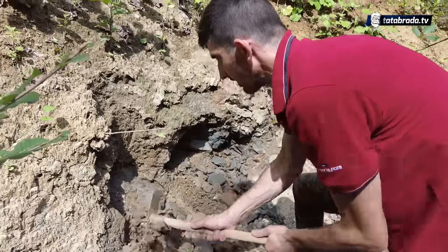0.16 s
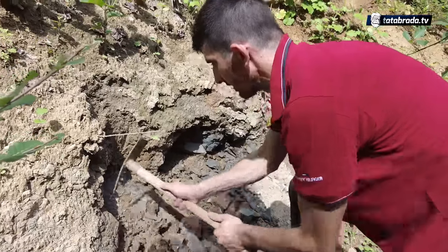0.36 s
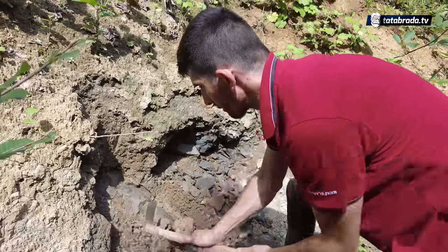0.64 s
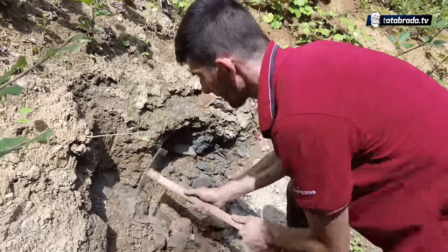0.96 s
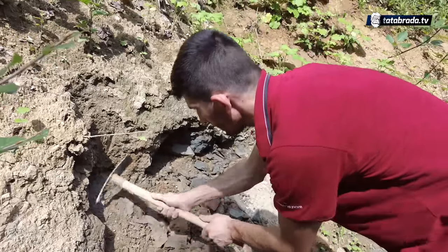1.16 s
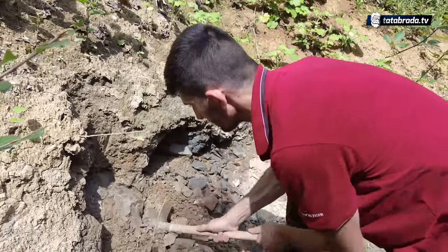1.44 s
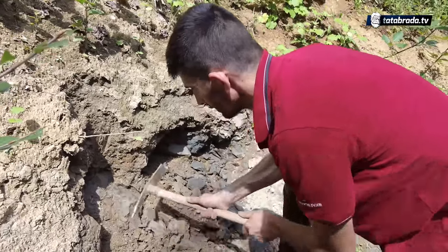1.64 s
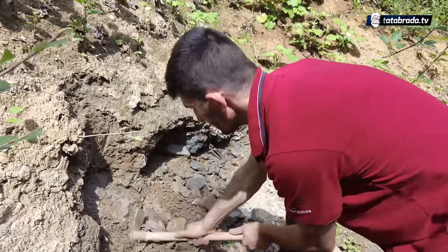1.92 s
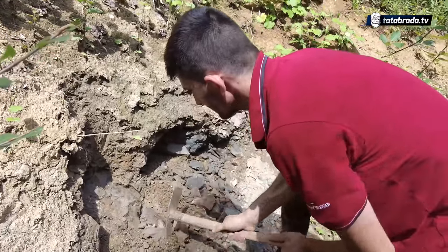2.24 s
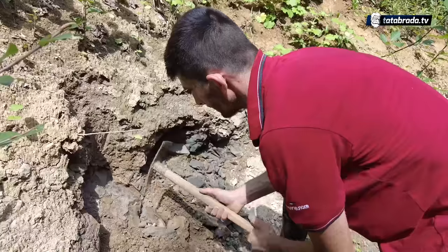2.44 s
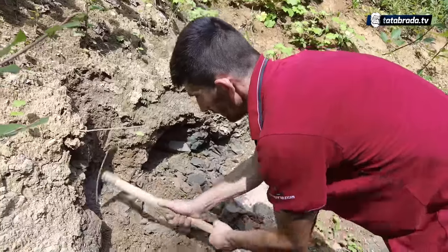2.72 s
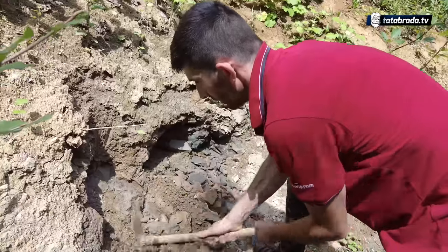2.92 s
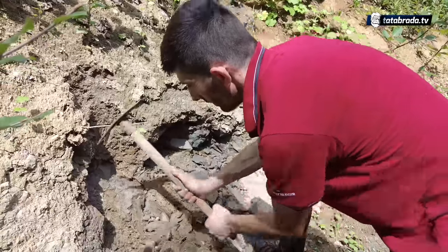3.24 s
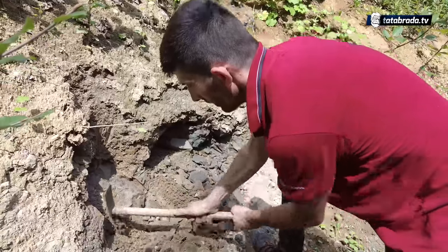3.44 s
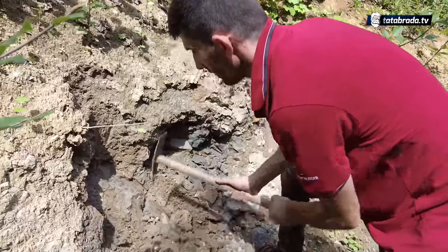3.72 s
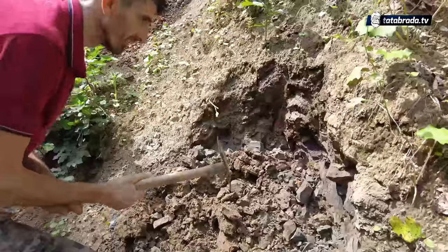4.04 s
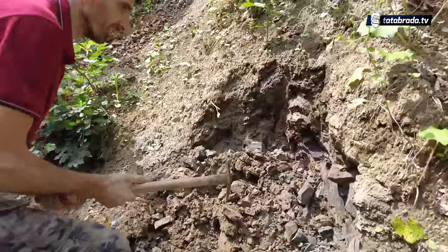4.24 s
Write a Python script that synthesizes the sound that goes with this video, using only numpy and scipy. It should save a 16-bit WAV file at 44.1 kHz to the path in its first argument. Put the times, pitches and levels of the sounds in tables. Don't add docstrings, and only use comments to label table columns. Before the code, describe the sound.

Outdoors, close to a crumbly shale bank, wind softly buffets the stereo microphone over faint air and hiss. Grit trickles, and from 0.07 s a small steel pick gives quick crunching knocks, with a dull clod at 0.3 s. Earthy blows with low thumps come at 0.6-0.85 s, a rough scrape at 0.65 s, then lighter dragging around 1.0-1.2 s. At 1.3-1.4 s two strong cracks, one stony, one steely, scatter chips, and flakes clatter near 1.6 s. The background drops slightly at 1.7 s. A loud bright strike lands at 1.94 s with a brief steel ring, then near calm. The sharpest, loudest blow hits at 2.86 s, followed by scraping and dropping clods to 3.0 s. A faint squeak at 3.3 s, a light clink with a low heave at 3.43 s and a duller knock at 3.6 s follow. Sound cuts out at 3.94-4.0 s, then weak taps, scrapes and crumbs continue to about 4.37 s.

```python
import sys
import numpy as np
from scipy import signal
from scipy.fft import rfft, irfft
from scipy.io import wavfile
from scipy.ndimage import map_coordinates

SR = 44100
rng = np.random.default_rng(int(sys.argv[2]) if len(sys.argv) > 2 else 0)


def how_loud(loudness_db):
    steps = np.asarray(loudness_db, float) / 20
    return 10 ** steps


def wav_out(sig):
    wavfile.write(sys.argv[1], SR, np.round(np.clip(np.atleast_2d(sig).T, -1, 1) * 32767).astype(np.int16))


N = 192672

# pitch_hz, level_db
FAR_AIR_SPECTRUM = [(71, -53), (120, -42), (195, -1.5), (468, -23), (718, -12), (791, -18.5), (1140, -18.5),
                    (1820, -15), (2220, -22), (2590, -20.5), (5630, -27), (12500, -33), (16200, -68),
                    (22000, -120)]
# pitch_hz, likeness (0 to 1)
AIR_LIKENESS = [(60, 0.71), (200, 0.91), (600, 0.05), (1400, 0.24), (6000, 0.89), (15000, .1)]
# top_s, rumble_db, flutter_db (relative
GUSTS = [(0.03, -38.5, -5), (0.63, -34.5, -16), (0.859, -43, -2.5), (1.2, -52, 1.5), (1.36, -45, 5),
         (1.58, -51.5, -23), (1.97, -38.5, -6.5), (2.24, -48, -10.5), (2.55, -56.5, -7), (2.87, -46, -0.5),
         (3.45, -36, -18), (3.7, -51.5, -7), (4.05, -46.5, -17.5), (4.37, -44, -5)]
# start_s, gain_db, drift_db_per_s
SHOT_GAINS = [
    (0, -0.5, 2.5),
    (1.681, -11, 1.7),
    (3.97, -2.5, -6),
]
# pitch_hz, width_hz, level_db
EARTH_MODES = [(190, 223, -5.5), (326, 123, -8), (560, 225, -1.5), (635, 160, 5), (830, 36, -10)]
# pitch_hz, width_hz, level_db
SHALE_MODES = [(1342, 122, -1), (1482, 174, 3), (1760, 500, -3), (2115, 1250, -4.5), (2950, 450, -2),
               (3613, 320, -4)]
# pitch_hz, width_hz, level_db
STEEL_MODES = [(4160, 280, 6), (4804, 150, 4.5), (4930, 67, -21.5), (5860, 250, 4.5), (6160, 147, -2.5),
               (8380, 330, -9), (9480, 460, -6), (9800, 83, -12.5), (11360, 2500, -13)]
# time_s, flow_db, fineness_db
TRICKLE = [(0.0, -50, -7), (0.16, -41, 1.5), (0.24, -57.5, -6), (0.44, -52.5, 0.5), (0.69, -43, -3.5),
           (0.84, -52.5, -2.5), (1.08, -56.5, 8), (1.22, -56.5, 0.5), (1.38, -44.5, 0), (1.66, -50.5, 2),
           (1.69, -64.5, 2.5), (2.02, -52, 5), (2.11, -56.5, 3.5), (2.4, -65, 2.5), (2.83, -69, 3),
           (3.6, -61.5, -4.5), (3.93, -69.5, -3), (4.37, -65, -2.5)]
# start_s, length_s, drag_db,
# fineness_db, swell_db (start to end)
STROKES = [(0.043, 0.032, -60, 7, 1.5), (0.07, 0.03, -37, 1.5, -8), (0.136, 0.072, -33.5, -2.5, -12.5),
           (0.65, 0.058, -22, -1.5, 1.5), (0.995, 0.067, -35, 5, 0.5), (1.073, 0.15, -39, 5, -3),
           (1.326, 0.08, -31.5, 2.5, -19), (1.418, 0.052, -33, 2, -15), (1.984, 0.033, -48, 2, -11),
           (2.016, 0.052, -37.5, -6.5, 7), (2.477, 0.11, -55.5, 10, 5), (2.879, 0.033, -43, -6.5, -6),
           (2.909, 0.12, -35, -2, -4), (3.53, 0.042, -48, 1.5, 11), (3.623, 0.047, -35.5, -6, -23.5),
           (4.221, 0.043, -41.5, -6, -7.5), (4.304, 0.058, -47, 3, 16), (4.002, 0.17, -63, -10, -0.5),
           (1.835, 0.018, -40, -2, -5)]
# start_s, peak_db, first_hz, last_hz, t60_s
GROUND_SHOCKS = [
    (.597, -17, 514, 69.4, 0.078),
    (.85, -16, 480, 387, 0.03),
    (1.325, -43, 405, 149, 0.21),
    (1.945, -18, 710, 410, 0.044),
    (1.966, -31, 303, 190, 0.22),
    (2.863, -25.5, 604, 138, 0.07),
    (3.437, -25.5, 59, 33.6, 0.41),
    (3.623, -35, 680, 560, 0.029),
]
# start_s, end_s, pitch_hz, width_hz, level_db
RUBBED_RINGS = [
    (1.973, 2.066, 4760, 70, -47),
    (3.281, 3.3, 2710, 89.5, -52),
    (3.44, 3.56, 4900, 60, -65),
    (3.454, 3.585, 6020, 60.6, -65),
    (1.833, 1.851, 714, 80.4, -49),
    (2.93, 2.974, 2940, 120, -48),
]
# start_s, peak_db, pitch_hz,
# crush_ms
FLAKES = [(0.0365, -31, 2670, 4.1), (0.398, -29, 6000, 1.6), (0.495, -35, 5140, 9), (0.746, -24, 3140, 1.6),
          (0.9408, -31.5, 2860, 2.8), (0.9967, -26, 1270, 7.1), (1.0041, -21, 4740, 1),
          (1.085, -29, 3220, 5.8), (1.3574, -17.5, 1460, 4.9), (1.377, -17, 3440, 5.1),
          (1.421, -25, 1460, 4.1), (1.5596, -27, 3100, 3.4), (1.6069, -19, 2110, 3.3),
          (1.6075, -24.5, 6500, 2.2), (1.6159, -20, 3200, 1.6), (1.972, -20, 4500, 2.7),
          (2.0632, -30, 1490, 1.6), (2.6657, -41, 640, 7), (2.7857, -41, 4860, 5.5),
          (2.871, -21, 5200, 4.1), (2.968, -29.5, 6200, 2.2), (1.277, -36, 4900, 3.5),
          (3.555, -33, 6200, 4.8), (4.347, -31.5, 2900, 6), (2.9503, -23, 3070, 2.2),
          (3.1277, -45, 2950, 9), (3.5346, -35.5, 2720, 0.73), (3.9257, -40, 1420, 1.9),
          (4.3256, -35, 2740, 12)]
# start_s, peak_db, pitch_hz, crush_ms
CLODS = [(0.1198, -29, 795, 3.4), (0.3048, -17, 1134, 2.6), (0.4658, -30, 830, 17), (0.5453, -21, 844, 7.2),
         (0.6534, -22, 780, 5), (0.849, -19.5, 433, 2.9), (1.5293, -32, 396, 5.5), (1.8358, -21.5, 800, 5),
         (3.003, -24, 820, 4), (2.9818, -20.5, 830, 3.7), (3.6244, -18.5, 562, 6.2), (3.6465, -33, 573, 6),
         (3.7241, -33, 440, 15), (4.0549, -29.5, 780, 7), (4.2275, -40, 900, 14)]
# start_s, peak_db, pitch_hz, crush_ms, fall_db_per_octave (away from that pitch)
STRIKES = [(0.0705, -18.5, 1730, 10.7, 6), (0.1438, -19.5, 560, 5.3, 1.5), (0.153, -19.5, 604, 2.5, 0.5),
           (0.5913, -18, 537, 7.9, 2.7), (0.6741, -16.5, 610, 3.6, 0.7), (0.7923, -32.5, 1550, 1.9, 5),
           (0.8416, -17, 9100, 4.2, 6), (1.3188, -12, 1340, 7.9, 0.6), (1.3993, -11, 4160, 3.9, 9),
           (1.501, -20.5, 3180, 7.9, 7.5), (1.568, -33, 560, 3.2, 4), (1.811, -22, 3060, 5.1, 6),
           (1.9388, -3, 4620, 6.1, 4), (1.9506, -21, 8600, 16, -0.2), (1.967, -24.5, 1500, 6.2, 5),
           (2.0297, -19.5, 4450, 5, 4.5), (2.8595, 1.6, 4900, 4.2, 3.6), (2.9963, -25.5, 4730, 21, 1.3),
           (3.2813, -27, 1350, 9.9, 8), (3.4271, -19, 6000, 6.5, 0.3), (3.548, -30.5, 810, 13.4, 1),
           (3.612, -12.5, 830, 4.2, 3), (4.1208, -35, 1310, 4.5, 1), (4.143, -37.5, 760, 13, 2)]

CLOD_FALL_DB, FLAKE_FALL_DB = 9.5, 8
EARTH_HZ, SHALE_HZ, STEEL_HZ = 560, 1920, 4630
EARTH_GRIT_DB, SAND_GRIT_DB = -4.5, 1
CONTACT_S = 0.011
GUST_RISE_DB_PER_S, GUST_FALL_DB_PER_S = 187, 113
CALM_RUMBLE_DB, CALM_FLUTTER_DB = -54, -61
AIR_DB, HISS_DB = -57, -53
PORT_LAG = 1.75
SILENCE_START_S, SILENCE_END_S = 3.9355, 4.0
CUTOFF_HZ = 15800


def in_time(rows):
    s, *columns = np.transpose(rows)
    return [np.interp(np.arange(N) / SR, s, c) for c in columns]


def at_hz(points, hz):
    points_hz, values = np.transpose(points)
    return np.interp(np.log(hz), np.log(points_hz), values)


def rms_one(x):
    return x / np.sqrt(np.mean(x ** 2) + 1e-20)


def drift(rate):
    knots = rng.standard_normal(2000)
    steps = np.arange(0, N + 64, 64)
    slow = map_coordinates(knots, [steps / SR * rate * 2], order=3, mode="wrap")
    return np.interp(np.arange(N), steps, slow)


def filtered(x, order, hz, kind="low"):
    return signal.lfilter(*signal.butter(order, hz, kind, fs=SR), x)


def band(x, order, low_hz, high_hz):
    return signal.sosfilt(signal.butter(order, [low_hz, high_hz], "band", fs=SR, output="sos"), x)


def resonance(x, hz, width_hz):
    r = np.exp(-np.pi * width_hz / SR)
    feed = np.array([1, 0, -1]) * (1 - r * r) / 2
    return signal.lfilter(feed, [1, -2 * r * np.cos(2 * np.pi * hz / SR), r * r], x + 1e-18)


def body(force, modes, uneven_db):
    total = sum(np.pi * width * how_loud(2 * db) / SR for hz, width, db in modes)
    out = 0
    for k, (hz, width, db) in enumerate(modes):
        met = force * how_loud(db + uneven_db * drift(25.0))
        out = out + (-1) ** k * resonance(met, hz, width)
    return out / np.sqrt(total)


def grains(per_s, spread_db):
    size = how_loud(spread_db * np.minimum(rng.exponential(1, N), 4)) * rng.choice([-1, 1], N)
    return rms_one(size * (rng.random(N) < per_s / SR))


def duller(x, top_hz):
    return filtered(x, 2, top_hz)


def microphone_gain_db():
    t, gain = np.arange(N) / SR, np.zeros(N)
    for start, db, db_per_s in SHOT_GAINS:
        gain = np.where(t >= start, db + db_per_s * (t - start), gain)
    return gain


def hiss():
    return rms_one(band(rng.standard_normal((2, N)), 6, 12700, 16500))


def far_air():
    out, edges = 0, 120 * 2 ** np.arange(0, 7.1, 1 / 3)
    white = rng.standard_normal((2, 2, N))
    for k, (low, high) in enumerate(zip(edges, edges[1:])):
        mid, side = band(white[k % 2], 2, low, high)
        hz = np.sqrt(low * high)
        alike = np.clip(at_hz(AIR_LIKENESS, hz), 0, 1)
        gain = how_loud(at_hz(FAR_AIR_SPECTRUM, hz) + 1.4 * drift(10.0))
        stereo = np.sqrt(1 + alike) * mid + np.sqrt(1 - alike) * side * [[1], [-1]]
        out = out + gain * stereo
    return rms_one(out) * how_loud(8.0)


def gust_levels(gain_db):
    t = np.arange(N) / SR
    rumble, flutter = how_loud(CALM_RUMBLE_DB + gain_db), how_loud(CALM_FLUTTER_DB + gain_db)
    for top, db, flutter_db in GUSTS:
        slope = np.where(t < top, GUST_RISE_DB_PER_S, GUST_FALL_DB_PER_S)
        push = how_loud(db - slope * np.abs(t - top))
        rumble = rumble + push
        flutter = flutter + push * how_loud(flutter_db)
    return rumble, flutter


def wind(low_hz, high_hz):
    low = band(rng.standard_normal((2, N)), 2, low_hz, high_hz)
    mid, side = rms_one(low) * how_loud(3.1 * drift(11.0))
    return (mid + how_loud(-20.5) * side * [[1], [-1]]) * how_loud([[-.8], [.8]])


def sorted_by_size(db, fineness_db):
    return how_loud([db - fineness_db + EARTH_GRIT_DB, db, db + fineness_db + SAND_GRIT_DB])


def grit_levels():
    t, levels = np.arange(N) / SR, sorted_by_size(*in_time(TRICKLE))
    for start, length, drag_db, fineness_db, swell_db in STROKES:
        near = (t > start - CONTACT_S) & (t < start + length + CONTACT_S)
        since = t[near] - start
        contact = np.clip(np.minimum(since, length - since) / CONTACT_S + .5, 0, 1)
        level_db = drag_db - 8.5 + swell_db * (since / length - .5)
        levels[:, near] += contact * sorted_by_size(level_db, fineness_db)
    return levels


def grit():
    clumps = how_loud(1.18 * drift(45.0))
    earth_level, shale_level, fine_level = grit_levels() * clumps
    earth = body(rms_one(duller(grains(2500.0, 2.8), 2140)), EARTH_MODES, 3.71) * earth_level
    chips = filtered(grains(2500.0, 3.7), 1, [1200, 4600], "band")
    clatter = body(grains(2500.0, 7.0), SHALE_MODES, 4.24)
    shale = (0.95 * clatter + 0.49 * rms_one(chips)) * shale_level
    sand = filtered(grains(5000.0, 7.9), 1, [3800, 7500], "band")
    on_steel = body(grains(1000.0, 4.9), STEEL_MODES, 2.0)
    fine = (0.24 * rms_one(sand) + 0.32 * on_steel) * fine_level
    dust = filtered([grains(5400.0, 3.0), grains(4900.0, 5.0)], 2, 9000, "high")
    return earth + shale + fine, how_loud(-10.0) * dust * fine_level


def steel_ring():
    t, out = np.arange(N) / SR, 0
    rubbing = rng.standard_normal(N) * how_loud(1.7 * drift(40.0))
    for start, end, hz, width, db in RUBBED_RINGS:
        touching = rubbing * (t > start) * (t < end)
        out = out + how_loud(db) * np.sqrt(SR / width / np.pi) * resonance(touching, hz, width)
    return out


def ground_shocks():
    out, t = np.zeros(N + SR), np.arange(SR // 2) / SR
    slide_s, rise_s = .008, 0.0027
    for s, db, first_hz, hz, t60 in GROUND_SHOCKS:
        turns = hz * t + (first_hz - hz) * slide_s * (1 - np.exp(-t / slide_s))
        level = how_loud(db - 60 * t / t60) * (1 - np.exp(-t / rise_s))
        out[round(s * SR):][:len(t)] += level * np.sin(2 * np.pi * turns)
    return out[:N]


def rung(bursts, modes, pitch_hz, peak_db):
    strengths = how_loud(2.48 * rng.standard_normal((len(bursts), len(modes))))
    out = 0
    for k, (hz, width, db) in enumerate(modes):
        out = out + (-1) ** k * how_loud(db) * strengths[:, [k]] * resonance(bursts, hz, width)
    low_hz, high_hz = modes[0][0], modes[-1][0]
    out += how_loud(-2.0) * resonance(bursts, np.sqrt(low_hz * high_hz), high_hz - low_hz)
    for k, hz in enumerate(pitch_hz):
        among = low_hz * .8 < hz < high_hz * 1.15
        out[k] += among * how_loud(7.5) * resonance(bursts[k], hz, hz / 8)
    return out / np.abs(out).max(axis=1, keepdims=True) * how_loud(peak_db)[:, None]


def blows():
    clods = [(*row, CLOD_FALL_DB) for row in CLODS]
    flakes = [(*row, FLAKE_FALL_DB) for row in FLAKES]
    s, db, pitch_hz, crush_ms, fall_db = np.transpose([*STRIKES, *clods, *flakes])
    thud_db, crack_db, steel_db = (db - fall_db * np.abs(np.log2(pitch_hz / hz)) - .6
                                   for hz in (EARTH_HZ, SHALE_HZ, STEEL_HZ))
    lead = 700
    t = (np.arange(3400) - lead) / SR * 1000
    cuts = rng.integers(0, N - len(t), len(s))
    fractures = grains(12000.0, 2.4)[cuts[:, None] + np.arange(len(t))]
    after = np.maximum(t, 0)
    crush = np.exp(-(after / (0.7 * crush_ms[:, None])) ** 2) + how_loud(-11.5 - 2.6 * after)
    graze = how_loud(-27.5 + 2.0 * t) * (t < 0)
    bursts = fractures * (crush * (1 - np.exp(-after / 1.1)) + graze)
    late = fractures[:, ::-1] * crush ** 0.96 * (1 - np.exp(-after / 2.2))
    thud = rung(duller(late, 1470), EARTH_MODES, pitch_hz, thud_db)
    crack = rung(duller(bursts, 3850), SHALE_MODES, pitch_hz, crack_db)
    steel = rung(bursts, STEEL_MODES, pitch_hz, steel_db)
    out = np.zeros(N + len(t))
    for start, row in zip(s, thud + crack + steel):
        out[round(start * SR) - lead:][:len(t)] += row
    return out[:N]


def ports(x):
    late = irfft(rfft(x) * np.exp(-2j * np.pi * np.arange(N // 2 + 1) / N * PORT_LAG), N)
    sway = how_loud(np.outer([1, -1], 0.87 * drift(0.85)))
    out = np.array([how_loud(-0.65) * x, how_loud(-0.5) * late]) * sway
    scattered = filtered(x, 1, 180, "high")
    for k, lag in enumerate((rng.uniform(.0008, .011, 28) * SR).astype(int)):
        echo = how_loud(-17.0 - 700 * lag / SR) * (-1) ** (k // 2) * scattered[:-lag]
        out[k % 2, lag:] += echo
        out[1 - k % 2, lag:] -= 0.44 * echo
    return out


def scene():
    gain_db = microphone_gain_db()
    rumble, flutter = gust_levels(gain_db)
    crumbs, dust = grit()
    bank = ports(blows() + steel_ring() + ground_shocks() + crumbs) + dust
    gusts = rumble * wind(22.7, 69.4) + flutter * wind(110, 265)
    background = how_loud(AIR_DB + gain_db) * far_air() + how_loud(HISS_DB + gain_db) * hiss()
    return bank + gusts + background


def top_cut(x):
    return signal.sosfilt(signal.butter(12, 16650, fs=SR, output="sos"), x)


def record(dry):
    t = np.arange(N) / SR
    trace = how_loud(-35.5 - 770 * (t - SILENCE_START_S)) * (t < SILENCE_START_S + .034)
    gate = np.where((t > SILENCE_START_S) & (t < SILENCE_END_S), trace, 1)
    rounded = 1.1 * np.tanh(dry / 1.1)
    low_pass = signal.cheby2(10, 30, CUTOFF_HZ + 150, fs=SR, output="sos")
    return top_cut(signal.sosfilt(low_pass, rounded) * gate)


dry = scene()
out = record(dry)
wav_out(out)
```